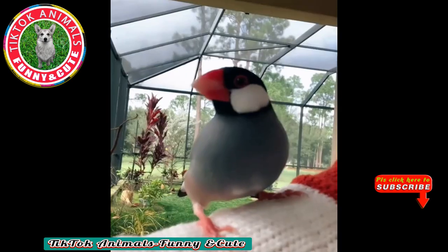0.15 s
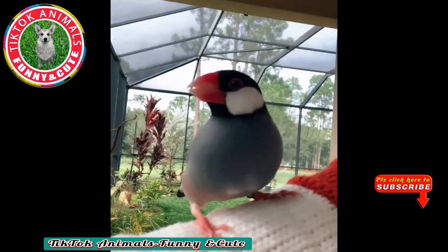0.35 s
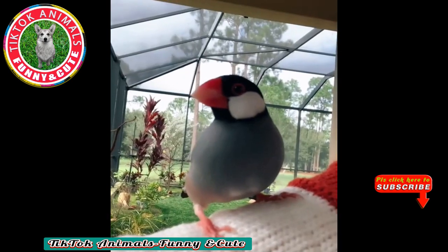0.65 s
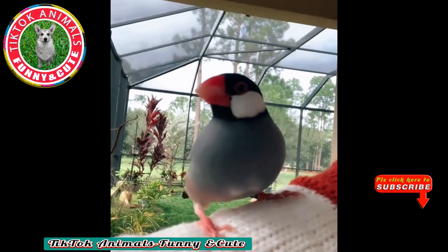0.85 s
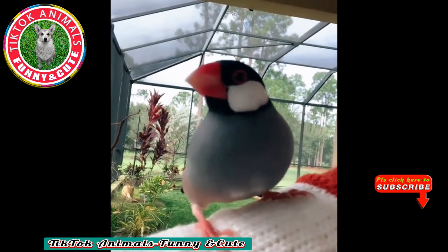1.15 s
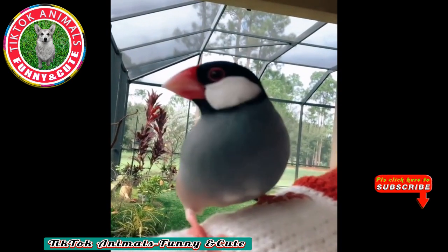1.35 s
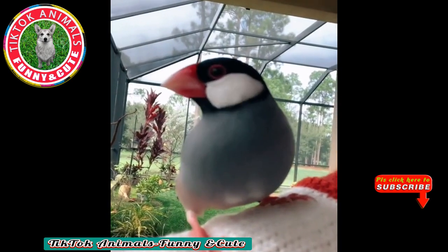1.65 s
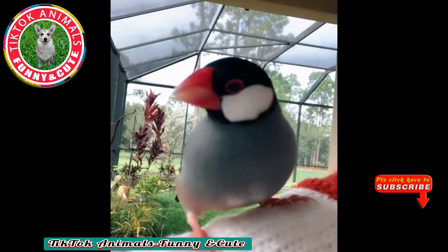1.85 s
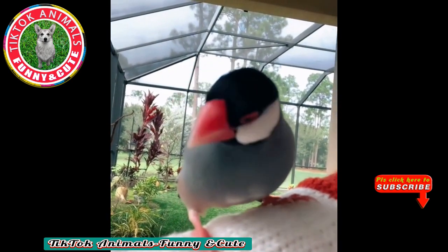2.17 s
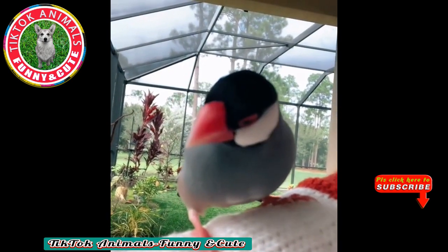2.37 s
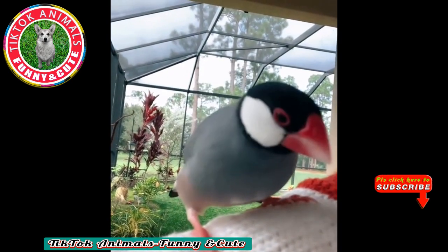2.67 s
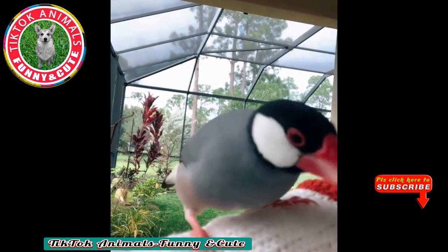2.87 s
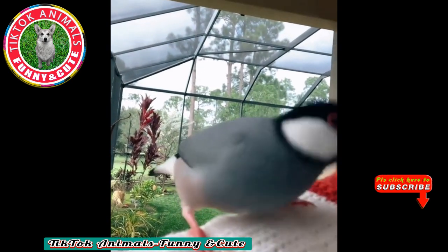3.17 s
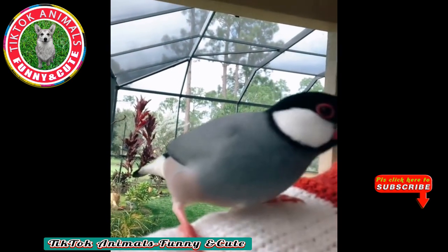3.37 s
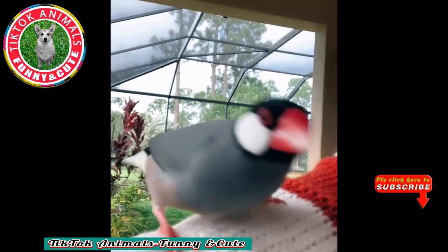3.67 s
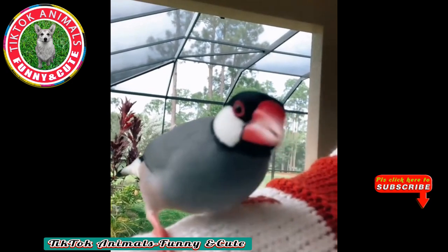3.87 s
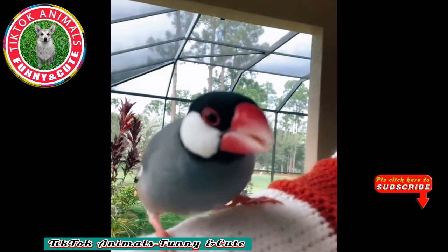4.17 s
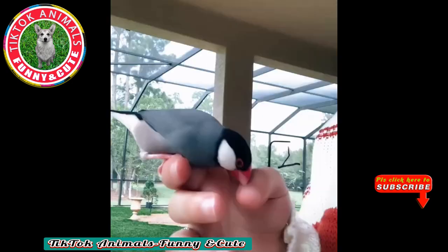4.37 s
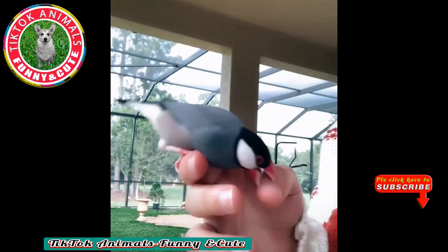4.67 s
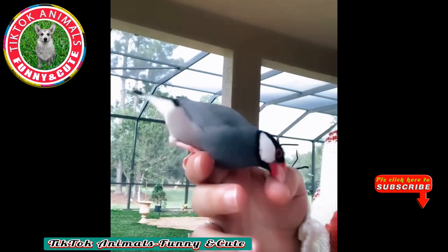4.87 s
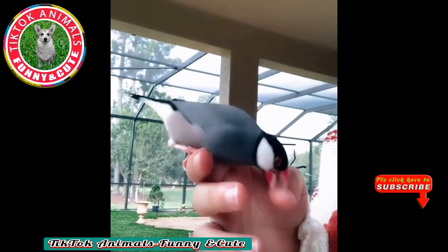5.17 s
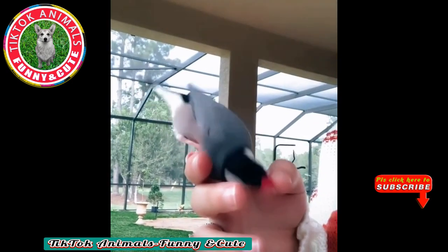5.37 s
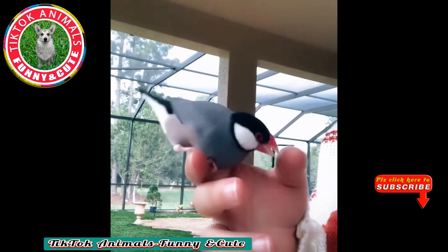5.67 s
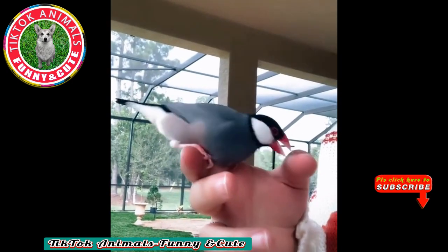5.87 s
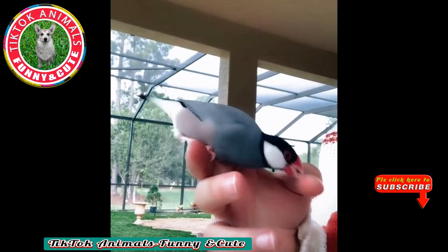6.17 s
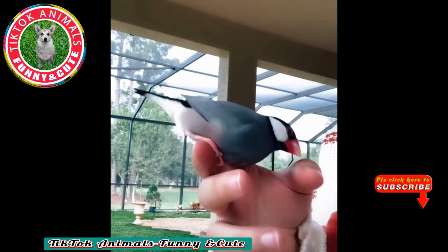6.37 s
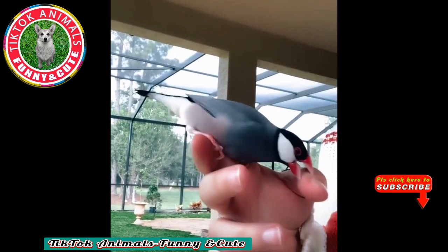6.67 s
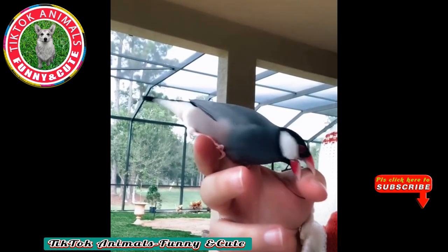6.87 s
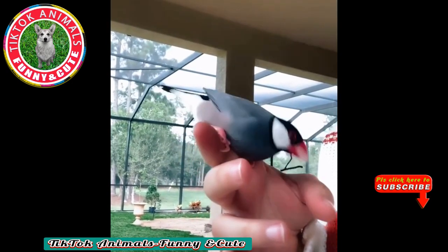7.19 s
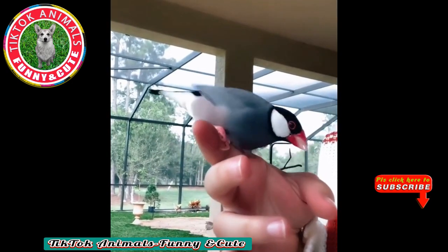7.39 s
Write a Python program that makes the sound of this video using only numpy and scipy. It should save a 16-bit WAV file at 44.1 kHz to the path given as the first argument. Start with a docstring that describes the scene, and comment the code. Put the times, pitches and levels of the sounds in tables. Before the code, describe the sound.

Cicadas buzz with a high, steady hiss in a garden, heard from a covered porch, while distant machinery rumbles low throughout. The sound cuts out twice, very briefly, in the first quarter second. Faraway birds give faint whistles and short buzzes, then a soft trill from 1.5 to 2.9 seconds and three buzzy scolds between 3 and 4 seconds. At 4.5 seconds, after another tiny gap, a different cicada takes over and a distant engine begins a wavering drone. Two faint two-tone calls follow around 5 seconds. At 5.6 seconds comes the loudest sound: a pet sparrow close by gives one short, harsh, raspy call. From about 6.2 seconds to the end at 7.5, some ten softer, quick chirps slide downward in pitch, about seven a second, over the buzz and hum. The porch roof and walls give the birds a short ring.

```python
"""Cicadas buzz in a garden, heard from a porch whose roof and walls give the birds a short ring. The main sound
comes at 5.6 s: a pet sparrow's one harsh, close call, made with both sides of its voice box. Birds further off
trill, scold, whistle and chirp, and distant machinery rumbles. The cicadas buzz by clicking drum-like plates
called tymbals. The sound drops out briefly three times; at 4.5 s the scene changes, to another cicada and a
droning engine."""
import sys
import numpy as np
from scipy import signal
from scipy.fft import rfft, irfft, next_fast_len
from scipy.io import wavfile
from scipy.ndimage import uniform_filter1d

SR = 44100
rng = np.random.default_rng(int(sys.argv[2]) if len(sys.argv) > 2 else 0)


def put_to_file(sound):
    """Save the sound as 16-bit audio at rate SR, in the file named by the first command-line argument."""
    columns = np.atleast_2d(sound).T  # one column per channel
    safe = np.clip(columns, -1, 1)
    whole_steps = np.round(safe * 32767)
    wavfile.write(sys.argv[1], SR, whole_steps.astype(np.int16))


N = 332073
T = np.arange(N) / SR
CHANGE_S, TOP_HZ = 4.5, 15500  # when the background changes; where the treble ends


# Moments when one of the sparrow's two voices rings clear.
# Each row: start in seconds, length in seconds, level in dB, voice (0 upper, 1 lower).
CLEAR_SURGES = [(5.638, .013, -29, 1), (5.641, 0.041, -22.5, 0), (5.694, 0.022, -24, 1),
                (5.705, 0.035, -21, 0), (5.731, 0.035, -18, 0)]

def sparrow(start_s=5.618, length_s=0.167, upper_db=-32, lower_db=-46, rasp_db=-28):
    """Both sides of the syrinx, the bird's voice box, sound at once and break into a rasp."""
    breath = gate(start_s, length_s, attack_s=0.017, release_s=0.021) ** 1.1
    age = np.clip(T - start_s, 0, length_s)
    upper_hz = np.interp(age, [0.08, 0.128], [4385, 3860]) + 45 * walk(120)  # holds, slides, holds
    arch = np.sqrt(np.abs(np.sin(np.pi * age / length_s)))
    lower_hz = 2450 + 592 * arch
    gains = [undb(upper_db) * breath, undb(lower_db) * breath]
    for s, length, db, voice in CLEAR_SURGES:
        side = int(round(voice))
        surge = undb(db) * gate(s, length, attack_s=0.0066, release_s=0.0066)
        gains[side] = np.maximum(gains[side], surge)
    throat = [(1500, -37), (2100, -20.5), (2600, -4.5), (3600, -5.5), (4600, 0.5), (6000, -4),
              (7400, -3), (8800, 0), (10000, -13), (12500, -18), (14500, -48)]  # (Hz, dB)
    flutter = 1 + 0.18 * walk(350)
    rasp = noise(throat) * undb(rasp_db) * breath * flutter
    upper = gains[0] * syrinx(upper_hz, jitter=0.014)
    shimmer = 1 + 0.42 * walk(330)
    lower = gains[1] * syrinx(lower_hz, jitter=0.012)
    return upper * shimmer + lower + rasp


# How well the open beak lets overtones out. Each row: frequency in Hz, gain in dB.
BEAK_RESPONSE = [(5000, -24), (6100, -21), (7400, -8), (8100, -17.5), (8700, -7), (9300, -7), (10300, -28),
                 (11100, -18), (11550, -14.5), (12100, -25), (13500, -36)]

def syrinx(hz, jitter):
    """An unsteady tone whose overtones swell as they cross the resonances of the beak."""
    phase = turn(hz * (1 + jitter * walk(900)))
    beak_hz, beak_db = np.transpose(BEAK_RESPONSE)
    overtones = sum(undb(np.interp(k * hz, beak_hz, beak_db)) * np.sin(k * phase) for k in (2, 3))
    return unit(np.sin(phase) + overtones)


# Falling chirps. Each row: start in seconds, length in seconds, first pitch in Hz, relative level in dB.
FALLING_CHIRPS = [(4.514, 0.019, 4800, -45.5), (6.216, .06, 5500, -47.5), (6.408, 0.055, 5050, -40),
                  (6.549, .05, 4800, -41.5), (6.675, 0.05, 5600, -39), (6.802, 0.052, 5907, -38.2),
                  (6.938, 0.046, 5400, -37), (7.082, 0.037, 4470, -38.5), (7.207, 0.04, 5320, -39.5),
                  (7.361, 0.034, 4155, -38), (7.5, 0.029, 4340, -39.5)]

def chirps(middle_hz=3570, end_hz=2326, throat_hz=3850, throat_width_hz=1100):
    """Quick slides, each with its own kink, loudest where they cross the bird's throat resonance."""
    out = np.zeros(N)
    for (s, length, hz, db), kink in zip(FALLING_CHIRPS, rng.random(len(FALLING_CHIRPS))):
        chirp = note(length, hz, middle_hz, end_hz, swell=0.069, depth_hz=59.7, flutter_hz=70,
                     kink_hz=0.0888 * kink * (hz - end_hz))
        add(out, s, undb(db) * chirp)
    throat = signal.iirpeak(throat_hz, throat_hz / throat_width_hz, fs=SR)
    ring = signal.lfilter(*throat, out)
    flicker = undb(2.9 * walk(130))
    return (undb(-8) * out + undb(-1) * ring) * flicker


# The notes of a trill. Each row: start in seconds, pitch at the top of the note in Hz.
TRILL_NOTES = [(1.536, 2495), (1.63, 2530), (1.718, 2534), (1.808, 2540), (1.902, 2627), (1.958, 2630),
               (2.018, 2593), (2.098, 2514), (2.193, 2524), (2.291, 2515), (2.392, 2620), (2.478, 2563),
               (2.575, 2620), (2.65, 2620), (2.698, 2477), (2.798, 2556)]

def trill(note_s=0.059, db=-47):
    """A garden bird sings a long run of short notes that each rise and fall."""
    out = np.zeros(N)
    for s, hz in TRILL_NOTES:
        arch = note(note_s, 0.95 * hz, hz, 0.96 * hz, swell=0.27, depth_hz=34.8, flutter_hz=85)
        add(out, s, undb(db) * arch)
    return out


# Plain whistles. Each row: start and length in seconds, first and last pitch in Hz, level in dB.
TREE_WHISTLES = [(.005, 0.087, 3520, 3480, -71.5), (0.076, 0.031, 4170, 2950, -55),
                 (0.218, 0.025, 3530, 3250, -51.5), (0.217, 0.029, 1790, 1600, -54),
                 (0.333, .03, 2350, 2760, -58.5), (0.998, .04, 2920, 3250, -55),
                 (1.111, 0.052, 2470, 3050, -53), (1.267, 0.031, 2970, 2630, -54.5),
                 (2.566, .064, 1702, 1765, -57), (2.735, 0.019, 1500, 1674, -47),
                 (4.54, 0.047, 2812, 2910, -42.5), (5.45, 0.013, 2280, 4660, -51),
                 (5.457, 0.015, 4630, 4970, -41), (6.045, .027, 2510, 2443, -48),
                 (6.266, 0.035, 2526, 2380, -47.5), (7.187, 0.026, 6000, 5300, -50),
                 (7.466, 0.023, 5580, 4800, -48.5)]
# Buzzy scolds. Each row: start and length in seconds, pitch and its sag in Hz, level in dB,
# level of the tail in dB relative to the buzz.
BUZZY_SCOLDS = [(0.52, .041, 2960, 20, -56.5, -12), (0.682, 0.066, 3060, 20, -55, -12),
                (.858, .05, 2910, 50, -59, -12), (2.728, 0.032, 3083, 70, -52.5, -14),
                (3.024, .18, 3314, 384, -47.3, -17.5), (3.427, .22, 2955, 40, -48.5, -21),
                (3.833, .15, 2764, 320, -48, -4.5), (4.428, 0.039, 3750, 140, -51.5, -9)]
# Distant calls on two tones at once. Each row: start in seconds, length in seconds, level in dB.
TWO_TONE_CALLS = [(4.684, .17, -58.5), (4.99, 0.19, -57.5)]

def garden_birds():
    """Birds in the trees whistle, scold and call on two tones."""
    out = np.zeros(N)
    for s, length, start_hz, end_hz, db in TREE_WHISTLES:
        middle_hz = (start_hz + end_hz) / 2
        whistle = note(length, start_hz, middle_hz, end_hz, swell=0.071, depth_hz=45, flutter_hz=118)
        add(out, s, undb(db) * whistle)
    for s, length, hz, sag_hz, db, tail_db in BUZZY_SCOLDS:
        add(out, s, undb(db) * scold(length, hz, sag_hz, tail_db))
    for s, length, db in TWO_TONE_CALLS:
        upper = note(length, 2480, 2320, 2290, swell=0.27, depth_hz=35, flutter_hz=90)
        lower = note(length, 1960, 1940, 1890, swell=0.18, depth_hz=35, flutter_hz=81)
        add(out, s, undb(db) * (upper + lower))
    return out


def scold(length, hz, sag_hz, tail_db, arch_hz=80, flutter_hz=125.3, end_hz=1920):
    """An arched buzz that sags, then trails off in a softer fall that levels out."""
    edge_hz = hz - arch_hz
    buzz = note(length, edge_hz + sag_hz / 2, hz, edge_hz - sag_hz / 2,
                swell=0.2, depth_hz=475, flutter_hz=flutter_hz)
    tail_hz = 0.82 * hz
    middle_hz = end_hz + 0.27 * (tail_hz - end_hz)
    tail = note(length, tail_hz, middle_hz, end_hz, swell=0.1, depth_hz=170, flutter_hz=flutter_hz)
    return np.concatenate([buzz, undb(tail_db) * tail * np.linspace(1, 0.3, len(tail))])


def note(length, start_hz, middle_hz, end_hz, swell, depth_hz, flutter_hz, kink_hz=0):
    """A whistle glides through three pitches; a kink makes it linger, a fast flutter makes it buzz."""
    progress = np.linspace(0, 1, int(length * SR))
    curve = np.polyfit([0, 0.5, 1], [start_hz, middle_hz, end_hz], 2)
    glide_hz = np.polyval(curve, progress) - kink_hz * np.sin(2 * np.pi * progress)
    drift = np.interp(progress, np.linspace(0, 1, 24), rng.standard_normal(24))
    flutter = np.sin(turn(flutter_hz * (1 + 0.35 * drift)))
    envelope = np.abs(np.sin(np.pi * progress)) ** swell  # more swell gives softer edges
    return np.sqrt(2) * np.sin(turn(glide_hz + depth_hz * flutter)) * envelope


# How strongly the cicadas' overtones ring. Each row: time in seconds, gain in dB.
OVERTONE_SWELL = [(.1, -4), (.25, 0.5), (3.3, 0), (4.45, -4.5), (4.6, -8), (5.6, -3), (6.4, 0.5), (7.5, -4)]

def cicadas():
    """A cicada buzzes until the scene changes at 4.5 s, then another is heard; their clicking speed wanders a
    little."""
    ring_gain = loudness(OVERTONE_SWELL)
    speed = 1 + 0.000499 * walk(24.98)
    return np.where(T < CHANGE_S, first_cicada(speed, ring_gain), second_cicada(speed, ring_gain))


# The first cicada's buzz. Each row: time in seconds, clicks per second, relative level in dB,
# level of its six-click strokes in dB relative to its four-click strokes.
FIRST_BUZZ = [(.2, 470.3, -45, -4), (.9, 470, -44.5, -8), (1.9, 469.1, -50, 5.5), (2.5, 468.8, -46, 1.5),
              (3.3, 468.3, -49, 6.5), (4.5, 468.6, -54.5, 7.5)]
# Tone colour of this cicada and the chorus behind it. Each row: frequency in Hz, relative level in dB.
FIRST_SPECTRUM = [(2000, -50), (3500, -0.5), (4300, 1.5), (4900, -2), (6100, -5.5), (8000, 0), (9000, -8.5),
                  (10700, -10.5), (11600, -18), (12400, -29), (13500, -46)]
# Overtones that ring out of the buzz, many in close pairs.
# Each row: starting pitch in Hz, relative level in dB before and after the stroke changes.
FIRST_OVERTONES = [(3806, -65, -66), (4216, -62, -61.5), (4310, -65, -59), (4740, -65.5, -68.5),
                   (5187, -60.5, -62), (5290, -60.5, -66.5), (5642, -77, -63), (5710, -60, -60.5),
                   (6140, -56.5, -60), (6300, -78, -65), (6625, -57, -53.5), (7040, -68, -61),
                   (7120, -70, -65), (7270, -56, -68), (7522, -70, -58), (7920, -65, -63.5),
                   (7992, -58, -55.5), (8170, -66, -75), (8460, -66, -60), (8780, -63, -66.5),
                   (10100, -74.5, -67), (10700, -89, -88)]
# Loudness of the chorus. Each row: time in seconds, level in dB.
CHORUS_LEVEL = [(.25, -58.5), (.85, -56), (1.36, -59), (3.1, -56), (4.15, -54.5), (4.45, -58)]
# The treble opens and closes with the insect's effort. Each row: time in seconds, boost in dB.
TREBLE_BOOST = [(.2, 2.5), (1.5, 3.5), (3, 1.5), (3.7, 4), (4.5, 1)]

def first_cicada(speed, ring_gain, change_start_s=1.34, change_length_s=1.2):
    """A near cicada shifts from one kind of stroke to another over the smooth hiss of the chorus."""
    click_hz, db, six_db = curves(FIRST_BUZZ)
    click_hz = click_hz * speed
    uneven_hz = click_hz * (1 + 0.0007 * walk(60))
    four_clicks = tymbal(uneven_hz, FIRST_SPECTRUM, clicks=4)
    six_clicks = tymbal(uneven_hz, FIRST_SPECTRUM, clicks=6)
    buzz = undb(db - 7.5) * (four_clicks + undb(six_db) * six_clicks)
    change = np.clip((T - change_start_s) / change_length_s, 0, 1)
    overtones = ((hz, before + change * (after - before)) for hz, before, after in FIRST_OVERTONES)
    ring = ring_gain * ringing(overtones, speed=click_hz / FIRST_BUZZ[0][1])
    chorus = loudness(CHORUS_LEVEL) * noise(FIRST_SPECTRUM)
    insects = buzz + ring + chorus
    treble = signal.sosfiltfilt(signal.butter(4, 9500, "high", fs=SR, output="sos"), insects)
    return insects + (loudness(TREBLE_BOOST) - 1) * treble


# Tone colour of the second cicada and its chorus. Each row: frequency in Hz, relative level in dB.
SECOND_SPECTRUM = [(2000, -19.5), (3800, -6.5), (5200, -6), (6500, -0.5), (7500, 2), (8700, -6),
                   (10000, -17), (12000, -27), (15000, -61)]
# Loudness of that buzz and chorus together. Each row: time in seconds, relative level in dB.
SECOND_LEVEL = [(4.5, -47), (4.8, -47), (5.2, -45), (6.1, -45.5), (6.9, -46.5), (7.53, -47)]
# Overtones that ring out of its buzz. Each row: pitch in Hz, relative level in dB.
SECOND_OVERTONES = [(5502, -58), (6029, -56.5), (6128, -64), (6374, -59), (6616, -54.5), (6837, -69),
                    (7354, -51), (7843, -68), (8825, -68.5)]

def second_cicada(speed, ring_gain, click_hz=408.5):
    """A slower cicada buzzes in five-click strokes, half hidden in the chorus."""
    buzz = undb(-6) * tymbal(click_hz * speed, SECOND_SPECTRUM, clicks=5)
    chorus = undb(-2) * noise(SECOND_SPECTRUM)
    return loudness(SECOND_LEVEL) * (buzz + chorus) + ring_gain * ringing(SECOND_OVERTONES, speed)


def tymbal(click_hz, spectrum, clicks, lowest_hz=5400):
    """A stroke of a few clicks repeats; the many paths to the porch scatter its overtones."""
    harmonics = np.arange(4097)
    level_scatter, phase_scatter = rng.standard_normal((len(harmonics), 2)).T
    hz = harmonics * np.mean(click_hz) / clicks
    in_band = (hz > lowest_hz) & (hz < TOP_HZ)
    stroke = irfft(undb(2 * level_scatter) * np.exp(2j * np.pi * phase_scatter) * in_band)
    strokes_done = turn(click_hz / clicks) / (2 * np.pi)
    position = (strokes_done % 1) * len(stroke)
    return colour(np.interp(position, np.arange(len(stroke)), stroke), spectrum)


def ringing(overtones, speed, fade_db=2.3):
    """Strong overtones follow the speed of the tymbal; each wavers, swells and fades alone."""
    clock = turn(speed)
    return sum(undb(db + fade_db * walk(2.965)) * np.sqrt(2) * np.sin(hz * clock + 0.25 * walk(35))
               for hz, db in overtones)


# How fast the engine turns. Each row: time in seconds, turns per second.
ENGINE_SPEED = [(4.55, 37), (4.8, 35.6), (5.15, 36.2), (5.4, 37.9), (5.7, 37.6), (6.05, 38.4), (6.4, 36),
                (7.5, 36.8)]
# Loudness of its low note and of its high note. Each row: time in seconds, level in dB.
LOW_NOTE_LEVEL = [(4.55, -44.5), (4.9, -37), (5.2, -39), (5.5, -53), (6.3, -58), (6.42, -37.5), (6.6, -35),
                  (6.72, -46)]
HIGH_NOTE_LEVEL = [(4.55, -44.5), (4.9, -37.5), (5.2, -39.5), (5.5, -43.5), (5.95, -40.5), (6.2, -50.5),
                   (6.55, -51.5), (6.68, -36.5), (7.5, -47)]

def engine():
    """A distant engine speeds up and eases off, droning at 3, 4 and 8 times its turning speed."""
    hz, = curves(ENGINE_SPEED)
    low = loudness(LOW_NOTE_LEVEL) * hum(3 * hz)
    middle = undb(-48) * hum(4 * hz)
    high = loudness(HIGH_NOTE_LEVEL) * hum(8 * hz)
    return low + middle + high


# Tone colour of the rumble, first alone and then with the engine.
# Each row: frequency in Hz, relative level in dB.
FIRST_RUMBLE = [(15, -26), (30, -10.5), (80, 1.5), (120, -4.5), (160, -4.5), (220, -3), (290, -6),
                (380, -18), (550, -21.5), (850, -23), (1300, -28), (2400, -32), (5000, -46.5), (14000, -81)]
SECOND_RUMBLE = [(15, -14), (33, 4), (48, -0.5), (95, 1), (145, -4), (180, -1), (310, -3.5), (390, -16),
                 (550, -19), (780, -17.5), (1300, -23), (2400, -26.5), (5000, -59), (14000, -62)]
# Loudness of the rumble and of the lowest hum. Each row: time in seconds, level in dB.
RUMBLE_LOUDNESS = [(0, -44), (.4, -40), (3.8, -38.5), (7.5, -40)]
LOW_HUM_LEVEL = [(4.9, -53), (5.4, -41.5), (6.5, -50.5), (6.85, -40), (7.5, -39.5)]

def machinery():
    """Distant machines rumble throughout; after the scene changes at 4.5 s an engine and three hums drone as
    well."""
    rumble = np.where(T < CHANGE_S, noise(FIRST_RUMBLE), noise(SECOND_RUMBLE))
    drone = engine() + loudness(LOW_HUM_LEVEL) * hum(hz=92)
    drone += undb(-46) * hum(hz=246, waver=0.95) + undb(-63.5) * hum(hz=340, waver=1)
    rumble *= loudness(RUMBLE_LOUDNESS) * undb(0.23 * walk(8))
    return rumble + drone * (T > CHANGE_S)


def hum(hz, waver=0.37):
    """A low tone that wavers in strength and pitch."""
    wobble = 1 + waver * (walk(32) + 1j * walk(32))
    return unit(np.real(wobble * np.exp(1j * turn(hz + np.zeros(N)))))


def porch(x, decay_s, wet_db, build_s, treble_db):
    """Direct sound plus scattered reflections that build up, then fall by 60 dB in decay_s."""
    t = T[:SR]
    tail = colour(rng.standard_normal(SR), [(4500, 0), (10000, treble_db)])
    tail *= undb(-60 * t / decay_s) * (1 - np.exp(-t / build_s))
    tail /= np.sqrt(np.sum(tail ** 2))
    return x + undb(wet_db) * signal.fftconvolve(x, tail)[:N]


def echo(x, delay_s, db):
    """A sound plus one late reflection from a wall."""
    return x + undb(db) * np.interp(T - delay_s, T, x)


def undb(db):
    """Turn decibels into a gain to multiply by."""
    return 10 ** (np.asarray(db) / 20)


def unit(x):
    """Scale to an average strength (rms) of 1."""
    return x / np.sqrt(np.mean(x ** 2))


def curves(table):
    """Join the values in each column of a time table with straight lines."""
    s, *columns = np.transpose(table)
    return [np.interp(T, s, column) for column in columns]


def loudness(table):
    """Turn rows of (seconds, dB) into a gain that moves over time."""
    return undb(curves(table)[0])


def colour(x, spectrum):
    """Shape a sound's tone with rows of (Hz, dB); its strength comes out as 1."""
    hz, db = np.transpose(spectrum)
    size = next_fast_len(len(x))
    bin_hz = np.maximum(np.fft.rfftfreq(size, 1 / SR), 1)
    gain = undb(np.interp(np.log(bin_hz), np.log(hz), db))
    return unit(irfft(rfft(x, size) * gain, size)[:len(x)])


def noise(spectrum):
    """Steady noise with the given tone colour."""
    return colour(rng.standard_normal(N), spectrum)


def walk(rate):
    """A random wander of strength 1 that changes course about rate times a second."""
    knots = rng.standard_normal(20000)
    return unit(np.interp(T * rate, np.arange(len(knots)), knots))


def turn(hz):
    """The phase of a moving pitch, in radians."""
    return 2 * np.pi * np.cumsum(hz) / SR


def gate(s, length, attack_s, release_s):
    """Fade in at time s, hold, then fade out."""
    return np.clip(np.minimum((T - s) / attack_s, (s + length - T) / release_s), 0, 1)


def add(out, s, x):
    """Mix a sound in at time s."""
    i = max(int(s * SR), 0)
    out[i:i + len(x)] += x[:max(N - i, 0)]


def scene():
    """The near sparrow, the further birds, the cicadas and the machinery, in one channel."""
    birds = porch(sparrow(), decay_s=0.57, wet_db=-6, build_s=0.0072, treble_db=-7.5)
    echoed_chirps = echo(chirps(), delay_s=0.054, db=-13.5)
    birds += porch(echoed_chirps, decay_s=0.39, wet_db=-7, build_s=0.0035, treble_db=-11.5)
    birds += porch(garden_birds(), decay_s=0.36, wet_db=0, build_s=0.0068, treble_db=-1)
    birds += porch(trill(), decay_s=0.41, wet_db=-3, build_s=0.0057, treble_db=0.5)
    return (birds + cicadas() + machinery())[None]


# Brief silences. Each row: start in seconds, end in seconds.
DROPOUTS = [(.107, .153), (.163, .226), (4.478, 4.519)]

def record(dry):
    """The sound drops out three times, and its highest treble is filtered away."""
    audible = np.ones(N)
    for start, end in DROPOUTS:
        audible[(T > start) & (T < end)] = 0
    lowpass = signal.ellip(8, 0.2, 70, TOP_HZ, fs=SR, output="sos")
    return signal.sosfilt(lowpass, dry * uniform_filter1d(audible, size=40))


dry = scene()
out = record(dry)
put_to_file(out)
```